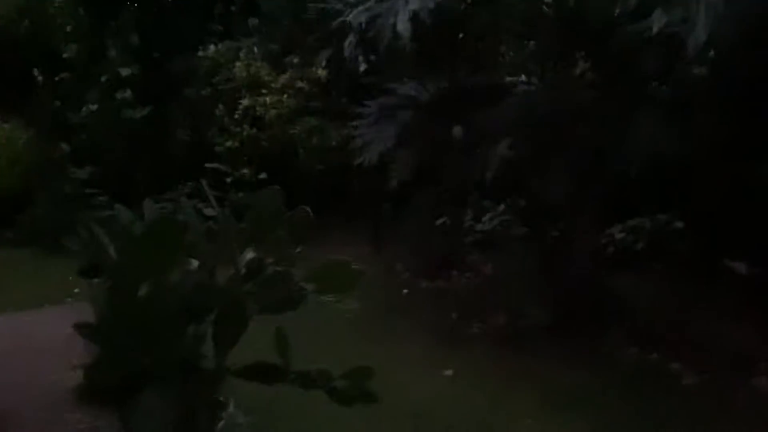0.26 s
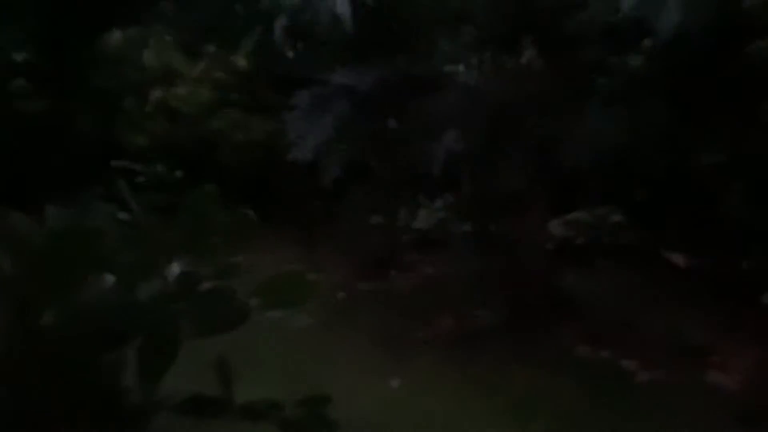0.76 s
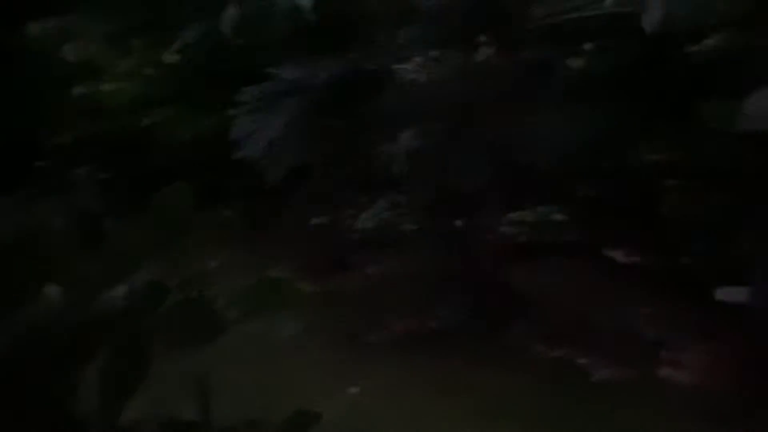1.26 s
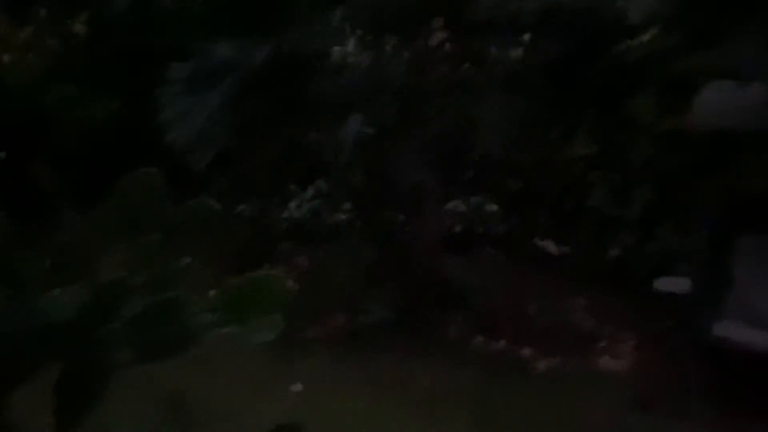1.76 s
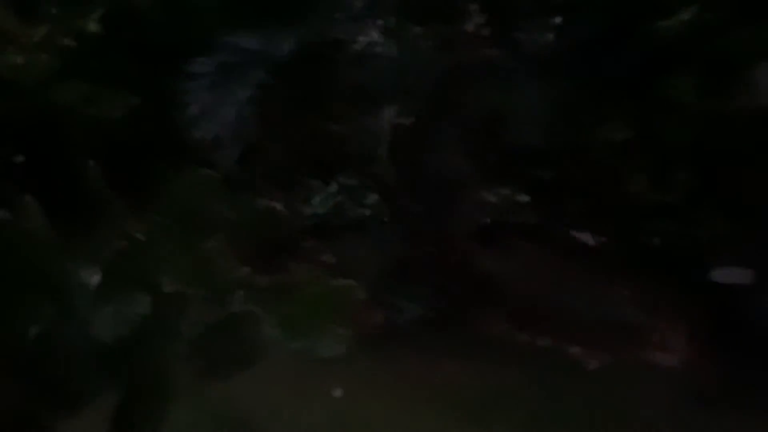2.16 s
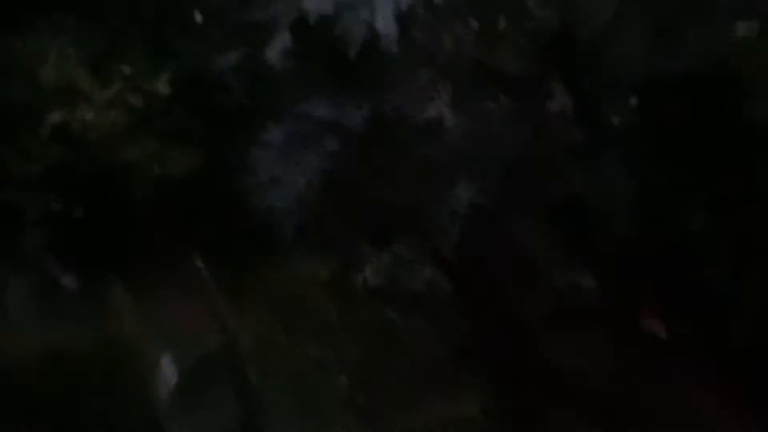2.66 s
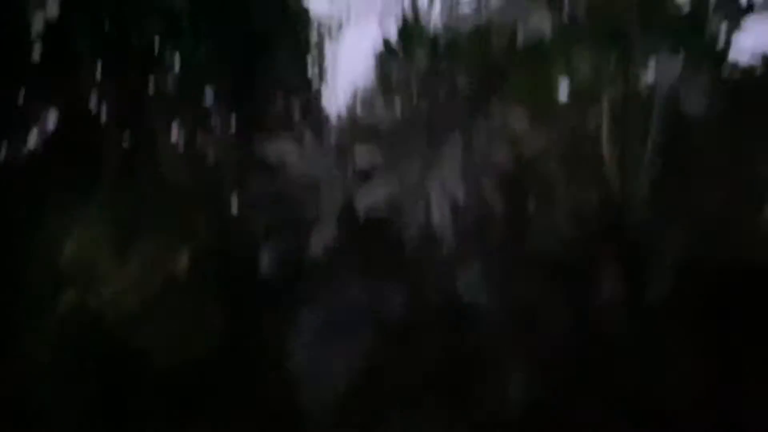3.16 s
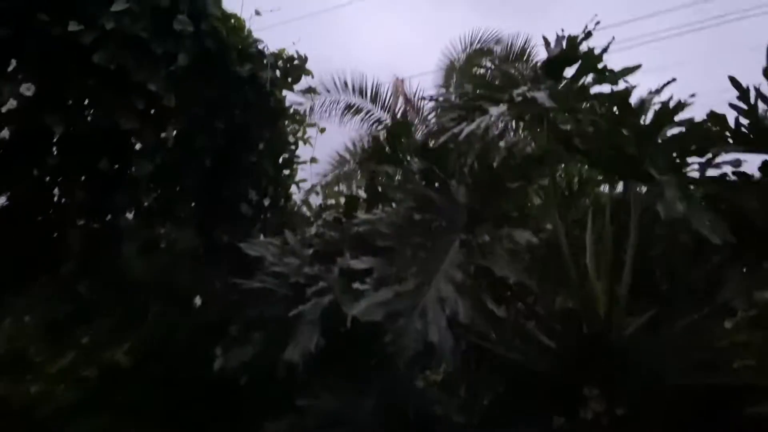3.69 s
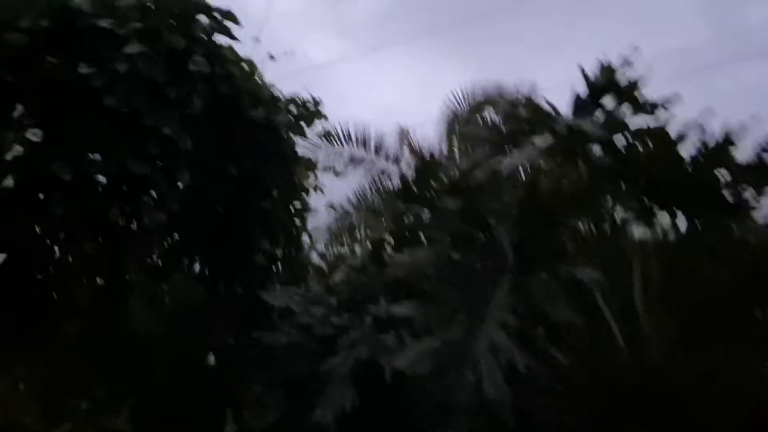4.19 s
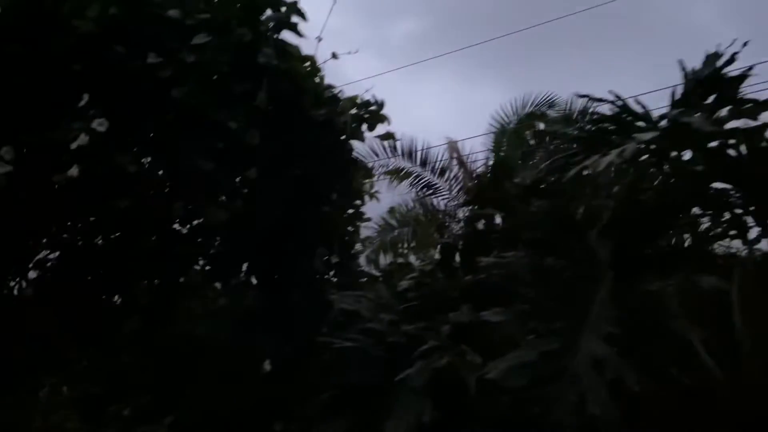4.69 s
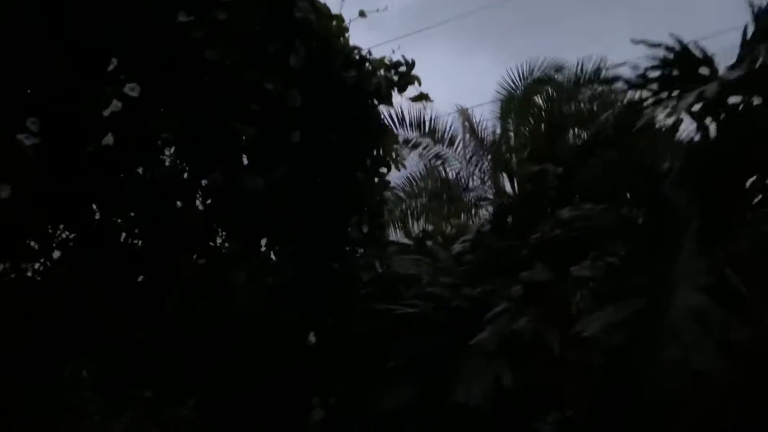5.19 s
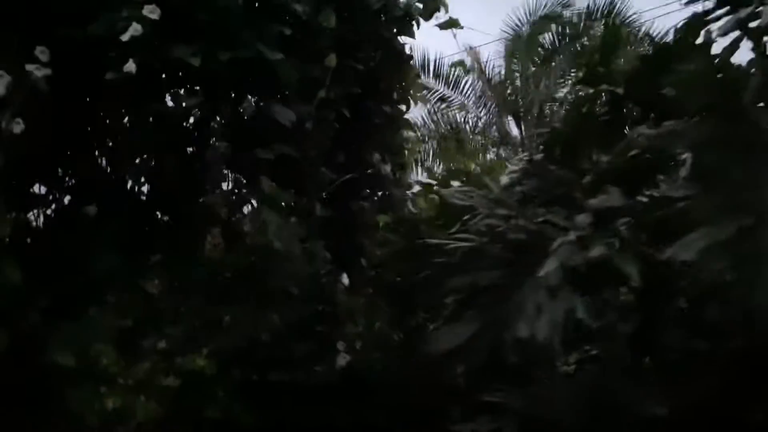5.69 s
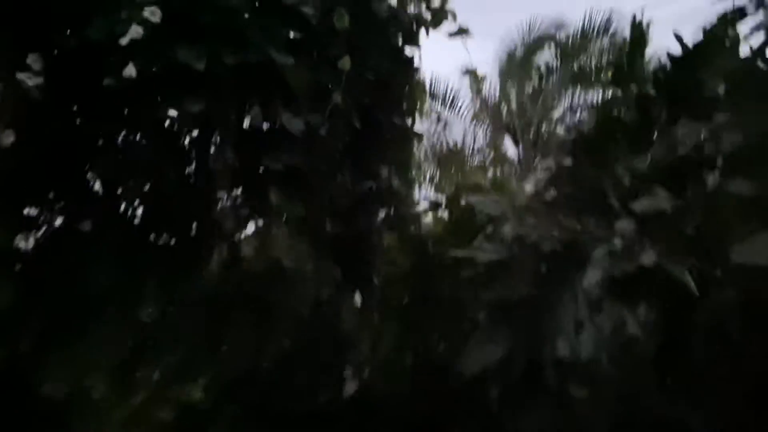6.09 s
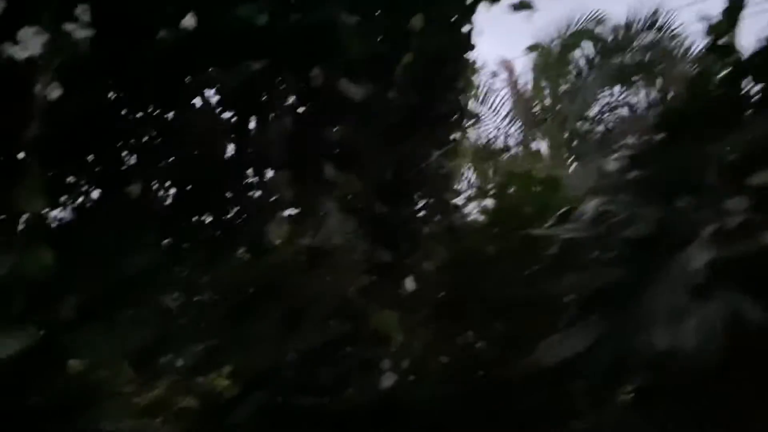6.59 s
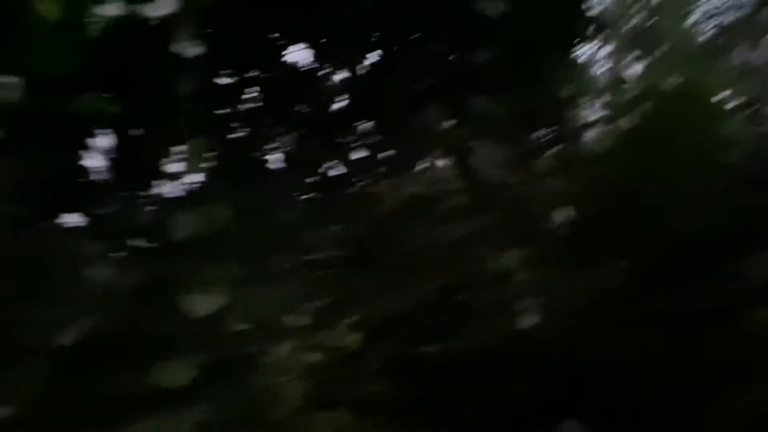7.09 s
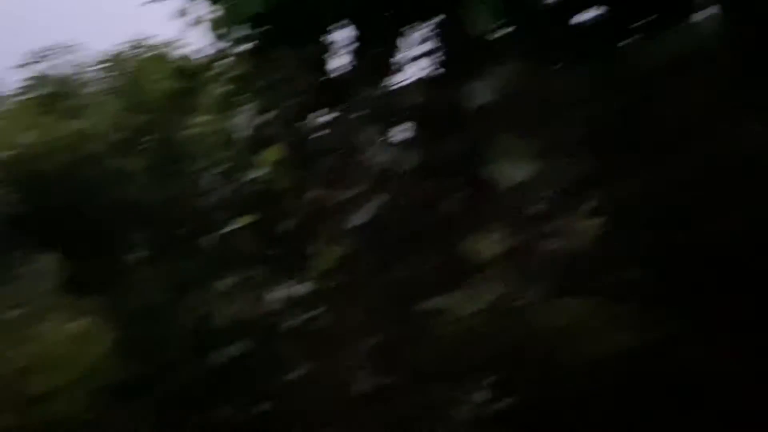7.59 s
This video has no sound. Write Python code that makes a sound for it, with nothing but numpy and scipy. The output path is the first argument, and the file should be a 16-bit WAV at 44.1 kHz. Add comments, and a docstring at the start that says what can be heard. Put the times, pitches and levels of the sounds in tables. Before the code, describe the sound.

Overlapping bird calls run without a break in a leafy garden. Brisk downward chips stand out in front, with mid-pitched sliding whistles among the trees and fainter, high, wavering peeps behind. Distant twittering swells and recedes. Leaves blur every call with short echoes, heard in open-air stereo. The bed is quiet, a steady deep rumble and thin hiss, with occasional tiny knocks and a faint rustle growing at the end.

```python
"""A leafy garden at dawn, full of birds. A near bird repeats a sharp falling chip two or three times a second,
another warbles slurred whistles, small birds add thin high notes and far flocks chatter: all are gliding tones.
Random echo clouds stand for leaves and trees, and a delayed dull copy of each chip for a wall.
Soft knocks tick over a low rumble and faint air, both of shaped noise; a sheen of hiss follows the calls.
A low rustle grows at the end."""
import sys
import numpy as np
from scipy import signal
from scipy.fft import rfft, irfft
from scipy.io import wavfile
from scipy.ndimage import map_coordinates

SR = 44100
rng = np.random.default_rng(int(sys.argv[2]) if len(sys.argv) > 2 else 0)


def generate_wav(signal):
    """Clip the signal to [-1, 1] and save it as 16-bit WAV at the path in sys.argv[1]."""
    frames = np.transpose(np.atleast_2d(signal))
    scaled = np.clip(frames, -1, 1) * 32767
    pcm = np.round(scaled).astype(np.int16)
    wavfile.write(sys.argv[1], SR, pcm)


N = 346185
TIME = np.arange(N) / SR


def from_db(db):
    """Decibels to amplitude gain."""
    return 10 ** (np.asarray(db) / 20)


def rms_one(x):
    """Scale to rms 1."""
    return x / np.sqrt(np.mean(x ** 2) + 1e-20)


def at_hz(points, hz):
    """Read a curve on a log-frequency axis."""
    f, value = np.transpose(points)
    return np.interp(np.log(hz + 1), np.log(f), value)


def level_over_time(points):
    """Turn (time, level) points into a gain for every sample, moving in straight lines of dB."""
    return from_db(np.interp(TIME, *np.transpose(points)))


def add(track, s, sound):
    """Mix a sound into a track at time s, cutting what runs past the end."""
    i = int(np.clip(s * SR, 0, N - 1))
    track[..., i:i + sound.shape[-1]] += sound[..., :N - i]


def wander(count, per_s):
    """Smooth random curve around zero, drawn through per_s random points a second."""
    knots = rng.standard_normal(256)
    return map_coordinates(knots, [np.arange(count) * per_s / SR], order=3, mode="wrap")


def spread(mid, side, alike):
    """Left and right from two independent noises: a likeness of 1 is mono, 0 is unrelated."""
    alike = np.clip(alike, -1, 1)
    return np.sqrt(1 + alike) * mid + np.sqrt(1 - alike) * side * [[1], [-1]]


def stereo_noise(spectrum):
    """Coloured noise at rms 1, nearly mono in the deep bass and wider in most of the range above."""
    # how alike left and right are: (frequency [Hz], likeness [-1 to 1])
    likeness = [(60, 0.96), (150, 0.84), (300, 0.71), (600, 0.23), (1200, 0), (3000, 0.5), (10000, 0)]
    hz = np.arange(N // 2 + 1) * SR / N
    mid, side = rfft(rng.standard_normal((2, N)))
    above = np.maximum(hz / spectrum[-1][0], 1)
    gain = from_db(at_hz(spectrum, hz)) / above ** 2  # 12 dB per octave further down past the last point
    return rms_one(irfft(gain * spread(mid, side, at_hz(likeness, hz)), N))


def note(length, pitches, crest, waver, waver_per_s, overtone_db, hold=0):
    """One syrinx tone: it holds its first pitch for a share of its length, glides on, wavers, swells and fades."""
    count = int(max(length, .01) * SR)
    u = np.arange(count) / count
    glide = np.interp(u, [np.clip(hold, 0, .9), 1], [0, 1])
    # a smooth curve of log pitch through start, middle and end
    bend = np.polyfit([0, .5, 1], np.log(pitches), 2)
    hz = np.exp(np.polyval(bend, glide))
    hz = hz * (1 + waver * wander(count, waver_per_s))
    phase = 2 * np.pi * np.cumsum(hz) / SR
    rise_and_fall = np.interp(u, [0, np.clip(crest, .05, .95), 1], [0, .5, 1])
    swell = np.sin(np.pi * rise_and_fall) ** .8
    return np.sqrt(2) * swell * (np.sin(phase) + from_db(overtone_db) * np.sin(2 * phase))


def slur(start_hz, end_hz, early):
    """Start, middle and end pitch of a slide that has gone the share `early` of its way at half glide."""
    return np.array([start_hz, start_hz * (end_hz / start_hz) ** early, end_hz])


def decay(t, delay, t60):
    """Echo power over time: it sets in after a delay and dies away by 60 dB in t60 seconds; sum 1."""
    power = (t >= delay) * from_db(-60 * np.abs(t - delay) / t60) ** 2
    return power / power.sum()


def scatter(fade_db, alike):
    """A stereo cloud of random echoes from leaves and branches under a decay curve."""
    mid, side = rng.standard_normal((2, len(fade_db)))
    return from_db(fade_db) * spread(mid, side, alike) / np.sqrt(2)


def screening(db):
    """The dB of direct sound that foliage takes from a fainter, more distant call."""
    near_db = -32.5  # calls at this level or above are not screened
    return 0.5 * np.clip(near_db - db, 0, 14)


def garden(sound, direct_db, leaves_db, trees_db, tail_db, pan_db):
    """Direct path, near foliage, trees and far tail; birds and listener move, so each call gets new echoes."""
    t = np.arange(SR // 2) / SR
    power = from_db(leaves_db) ** 2 * decay(t, delay=0.00075, t60=0.13)
    power += from_db(trees_db) ** 2 * decay(t, delay=0.029, t60=0.38)
    power += from_db(tail_db) ** 2 * decay(t, delay=0.029, t60=0.8)
    paths = scatter(10 * np.log10(power + 1e-20), alike=0.28)
    paths[:, 0] += from_db(direct_db)
    heard = signal.fftconvolve(sound[None], paths, axes=1)
    # echoes colour a call, but its energy depends only on the call and the strength of the paths
    heard *= np.linalg.norm(sound) * np.linalg.norm(paths) / np.linalg.norm(heard)
    return heard * from_db([[pan_db / 2], [-pan_db / 2]])  # positive pan leans left


def distant_rumble():
    """Low steady noise, strongest below about 100 Hz and leaning slightly left."""
    # rumble spectrum before overall scaling: (frequency [Hz], relative level [dB per Hz])
    spectrum = [(13, -45), (22, -35.5), (44, -2.5), (66, 3), (106, -2.5), (213, -18), (266, -15),
                (338, -20), (491, -20.5), (544, -17), (635, -23), (820, -21.5), (989, -26), (1300, -32.5),
                (1690, -46.5), (2860, -120)]
    return from_db(-54) * stereo_noise(spectrum) * from_db([[1.2], [-1.2]])


def still_air():
    """Faint steady hiss, fullest in the low treble."""
    # air spectrum before overall scaling: (frequency [Hz], relative level [dB per Hz])
    spectrum = [(900, -12), (1300, -3), (2500, -4), (5000, -11), (7000, -21), (9000, -35), (11500, -30),
                (16000, -46)]
    return from_db(-67.0) * stereo_noise(spectrum)


def low_rustle():
    """Soft low noise that grows out of near silence at the end."""
    # rustle spectrum before overall scaling: (frequency [Hz], relative level [dB per Hz])
    spectrum = [(60, -17.5), (130, -10.5), (280, 1), (500, -6.5), (1000, -32.5)]
    return level_over_time([(7.1, -95), (7.8, -65)]) * stereo_noise(spectrum)


def sheen(calls):
    """Soft, very high hiss that swells with each call and lingers briefly."""
    # sheen spectrum before overall scaling: (frequency [Hz], relative level [dB per Hz])
    spectrum = [(4000, -28.5), (7000, 2.5), (9000, -24.5), (11000, 8), (15500, -5)]
    fade_s = 0.016  # time constant of the followed power
    r = np.exp(-1 / (fade_s * SR))
    call_power = np.mean(calls ** 2, axis=0) + 1e-18
    loudness = np.sqrt(signal.lfilter([1 - r], [1, -r], call_power))
    return from_db(-37) * loudness * stereo_noise(spectrum)


def far_flock(low_hz, high_hz, glide, count):
    """Many distant birds call at random, bending up and down, heard only as echo; rms 1."""
    out = np.zeros(N)
    for k, (when, span, height, loud, bend, fall) in enumerate(rng.random((count, 6))):
        hz = low_hz * (high_hz / low_hz) ** height
        pitches = hz * np.exp(glide * np.array([bend - .5, 0, fall - .5]))
        length = 0.0296 + 0.065 * span
        call = note(length, pitches, crest=0.56, waver=0.0367, waver_per_s=500, overtone_db=-45.0)
        add(out, (k + when - 1) / count * N / SR, (.5 + loud) * call)
    echoes = scatter(-60 * TIME[:SR // 2] / 0.18, alike=0.31)  # down 60 dB in 0.18 s
    return rms_one(signal.fftconvolve(out[None], echoes, axes=1)[:, :N])


def far_chatter():
    """A distant flock of mid-pitched calls with wide glides, coming and going."""
    # loudness of the chatter: (time [s], level [dB])
    levels = [(0.0, -70), (0.5, -64), (1.5, -65), (3.0, -71.5), (4.2, -61), (4.7, -61), (5.6, -63.5),
              (6.6, -67), (7.0, -63.5), (7.85, -66.5)]
    return level_over_time(levels) * far_flock(low_hz=1918, high_hz=4036, glide=0.45, count=260)


def far_twitter():
    """A distant flock of higher calls with narrower glides, coming and going."""
    # loudness of the twitter: (time [s], level [dB])
    levels = [(0.0, -111), (0.4, -79.5), (1.92, -85), (2.19, -65), (3.0, -74.5), (3.15, -69), (6.16, -75),
              (7.26, -82.5), (7.85, -73)]
    return level_over_time(levels) * far_flock(low_hz=3950, high_hz=6950, glide=0.22, count=220)


def ticks():
    """Each tick is a brief, fast-damped knock with a shorter bright burst of noise on top."""
    # soft ticks: (time [s], level before the garden's paths [dB], body pitch [Hz])
    tick_list = [(0.632, -57.5, 1320), (1.99, -63, 700), (2.336, -62, 1550), (7.307, -63, 870)]
    out, t = np.zeros((2, N)), np.arange(SR // 20) / SR
    bright = signal.butter(2, [2500, 7500], "band", fs=SR, output="sos")
    for s, db, hz in tick_list:
        knock = np.sin(2 * np.pi * hz * t) * from_db(-60 * t / 0.0061)
        snap = signal.sosfilt(bright, rng.standard_normal(len(t))) * from_db(-60 * t / 0.001)
        tick = from_db(db) * (knock + from_db(-6) * snap)
        add(out, s, garden(tick, direct_db=19.5, leaves_db=26.0, trees_db=-5, tail_db=-9, pan_db=-1))
    return out


def small_birds():
    """Thin wavering notes, mostly falling, blurred by distance: echoes outweigh the direct sound."""
    # thin notes: (time [s], length [s], start pitch [Hz], end pitch [Hz], level before the garden's paths [dB])
    thin_notes = [(0.113, 0.15, 4880, 7550, -67), (0.433, 0.08, 6570, 5750, -67),
                  (1.253, 0.066, 6600, 4170, -55), (1.494, 0.078, 5760, 4770, -62),
                  (1.914, 0.1, 4440, 3970, -53.5), (1.919, 0.21, 7520, 5880, -63),
                  (1.924, 0.24, 8150, 7100, -68), (2.294, 0.052, 5910, 4170, -50),
                  (2.479, 0.092, 6170, 3570, -52), (2.696, 0.046, 6300, 6420, -62.5),
                  (3.007, 0.054, 6430, 7870, -59), (3.092, 0.076, 7070, 6700, -58.5),
                  (3.157, 0.045, 5360, 5430, -51.5), (3.343, 0.047, 6660, 4380, -56.5),
                  (3.911, 0.13, 7840, 6690, -51), (4.078, 0.056, 4000, 3820, -54.5),
                  (4.397, 0.066, 5380, 4590, -49.5), (4.672, 0.099, 4150, 4460, -62.5),
                  (4.682, 0.047, 6220, 5350, -64), (4.829, 0.08, 7150, 6120, -57.5),
                  (4.943, 0.078, 5900, 4360, -58.5), (5.199, 0.22, 4810, 4320, -57),
                  (5.476, 0.037, 7100, 6100, -66.5), (5.498, 0.086, 6080, 6320, -64),
                  (5.627, 0.13, 5370, 4680, -62), (5.808, 0.062, 5700, 5560, -59.5),
                  (5.86, 0.064, 6150, 6500, -66.5), (5.96, 0.11, 6000, 6800, -64),
                  (6.238, 0.024, 6880, 6660, -68), (6.394, 0.046, 4880, 5470, -66),
                  (6.608, 0.11, 5010, 4670, -60), (6.7, 0.057, 4620, 5740, -61.5),
                  (7.27, 0.044, 6420, 4750, -59)]
    out = np.zeros((2, N))
    for s, length, start_hz, end_hz, db in thin_notes:
        pitches = slur(start_hz, end_hz, early=0.72)
        tone = note(length, pitches, crest=0.35, waver=0.026, waver_per_s=790, overtone_db=-44.0)
        call = from_db(db) * tone
        add(out, s, garden(call, direct_db=-13, leaves_db=-8, trees_db=-9.0, tail_db=-15.5, pan_db=1.5))
    return out


def warbler():
    """Whistles from within the trees, some pure, some burry: each slides quickly, then settles on its last pitch."""
    # slurred whistles: (time [s], length [s], start pitch [Hz], end pitch [Hz],
    # level before the garden's paths [dB], burr [share of pitch])
    whistles = [(0.138, 0.071, 3270, 4000, -58, 0.02), (0.188, 0.056, 4160, 4130, -58, 0.015),
                (0.172, 0.11, 1753, 2333, -50, 0.052), (0.425, 0.079, 3030, 2698, -46.5, 0.048),
                (0.465, 0.064, 2858, 2854, -42, 0.014), (0.507, 0.057, 2625, 2370, -51, 0.049),
                (0.703, 0.04, 2670, 2453, -44, 0.013), (0.744, 0.071, 2510, 2393, -46, 0.015),
                (0.818, 0.032, 2396, 2363, -39, 0.0055), (0.873, 0.051, 2416, 2324, -47, 0.017),
                (1.059, 0.063, 3236, 3256, -49, 0.017), (1.146, 0.041, 3224, 3180, -45.5, 0.031),
                (1.174, 0.09, 3250, 2006, -49, 0.019), (1.608, 0.029, 2060, 2250, -48, 0.035),
                (1.61, 0.029, 2790, 2920, -62, .04), (1.657, 0.057, 2794, 2305, -49, 0.039),
                (1.896, 0.21, 3500, 2710, -61, 0.06), (2.617, 0.036, 1813, 2240, -43.5, 0.0084),
                (2.679, 0.13, 1546, 1914, -59, 0.039), (2.698, 0.047, 3380, 3282, -57.5, .012),
                (2.876, 0.066, 3830, 3340, -53, 0.034), (2.893, 0.19, 3400, 2150, -47, 0.0063),
                (3.227, 0.051, 3185, 3244, -49, 0.031), (3.228, 0.094, 2312, 2744, -47.5, 0.067),
                (3.264, 0.079, 3200, 1733, -52.5, 0.024), (3.352, 0.087, 1700, 1880, -51.5, 0.0048),
                (3.414, 0.087, 3640, 3720, -60.5, 0.02), (3.559, 0.063, 3740, 3240, -45.5, 0.013),
                (3.627, 0.064, 3180, 3130, -44.5, 0.0016), (3.842, 0.064, 2890, 2335, -45.5, 0.016),
                (3.883, 0.043, 2420, 2670, -40, 0.027), (3.924, 0.0444, 2600, 1993, -43, 0.013),
                (3.972, 0.039, 1880, 1796, -47, 0.0055), (4.973, 0.13, 3584, 3420, -57.5, 0.015),
                (5.062, 0.0674, 2820, 2260, -44.5, 0.051), (5.077, 0.091, 3430, 3684, -53.5, 0.022),
                (5.099, 0.054, 1954, 1634, -50, 0.049), (5.152, 0.095, 3610, 3270, -57.5, 0.021),
                (5.479, 0.095, 1750, 2326, -47.5, 0.071), (5.486, 0.13, 2750, 3310, -61.5, 0.032),
                (5.725, 0.12, 2718, 2810, -40, 0.048), (5.731, 0.037, 2020, 1824, -47.5, 0.019),
                (5.813, 0.073, 2550, 2356, -52.5, 0.051), (6, 0.15, 3000, 3370, -67, 0.03),
                (6.246, 0.11, 2900, 2670, -64, 0.035), (6.255, 0.048, 1740, 1980, -49, 0.049),
                (6.258, 0.056, 1544, 1478, -56.5, 0.032), (6.286, 0.032, 2090, 2245, -45.5, 0.03),
                (6.303, 0.067, 1773, 1360, -54.5, 0.042), (6.489, 0.09, 1370, 1714, -54, 0.046),
                (6.59, 0.084, 1767, 2250, -48.5, 0.0038)]
    out = np.zeros((2, N))
    for s, length, start_hz, end_hz, db, burr in whistles:
        pitches = slur(start_hz, end_hz, early=0.8)
        tone = note(length, pitches, crest=0.37, waver=burr, waver_per_s=400, overtone_db=-48.5)
        call = from_db(db) * tone
        direct_db = 0.0 - screening(db)
        add(out, s, garden(call, direct_db, leaves_db=0.5, trees_db=-9, tail_db=-8, pan_db=1.0))
    return out


def flicks():
    """The near bird opens some strong chips with a brief high tone that plunges just before the main stroke."""
    # opening flicks: (time [s], start pitch [Hz], end pitch [Hz], level before the garden's paths [dB])
    flick_list = [(2.125, 4930, 2560, -44), (3.495, 4890, 2450, -42), (6.107, 4440, 2530, -35.5),
                  (7, 3643, 2230, -39.5)]
    length = 0.02  # seconds
    out = np.zeros((2, N))
    for s, start_hz, end_hz, db in flick_list:
        pitches = slur(start_hz, end_hz, early=0.75)
        tone = note(length, pitches, crest=0.57, waver=0.011, waver_per_s=200, overtone_db=-34, hold=0.38)
        call = from_db(db) * tone
        add(out, s, garden(call, direct_db=-11, leaves_db=0, trees_db=-5.5, tail_db=-22.0, pan_db=2.0))
    return out


def near_bird():
    """Fast falling strokes from both sides of the syrinx; as the bird turns, a wall throws back more or less."""
    # falling chips: (time [s], length [s], start pitch [Hz], middle pitch [Hz], end pitch [Hz],
    # level before droop and the garden's paths [dB], wall echo against the chip before dulling [dB])
    chips = [(0.280, 0.047, 3600, 2260, 1600, -42.5, -2), (0.654, 0.046, 3656, 2410, 1745, -40, -4),
             (1.096, 0.052, 2930, 2185, 1410, -40, -10), (1.436, 0.049, 3090, 2405, 1830, -57.5, -3),
             (1.713, 0.057, 3550, 2600, 1540, -49.5, -15), (2.135, 0.046, 4236, 2452, 1620, -35.5, -17),
             (2.523, 0.053, 3350, 2200, 1380, -39, -7.5), (3.021, 0.071, 3505, 2406, 1520, -37, -4),
             (3.505, 0.043, 4150, 2320, 1743, -33, -22), (3.813, 0.038, 2955, 2370, 1850, -51, -19),
             (3.917, 0.057, 3650, 2350, 1920, -37, -4), (4.21, 0.049, 3950, 2500, 1745, -51, -23),
             (4.35, 0.071, 3070, 2267, 1320, -37, -14), (4.577, 0.063, 3350, 2400, 1700, -52.5, -17),
             (4.851, 0.05, 3590, 2240, 1500, -37, -10), (5.275, 0.032, 3576, 2346, 1840, -36.5, -2.5),
             (5.637, 0.071, 3790, 2537, 1636, -35, -9.5), (6.119, 0.043, 4000, 2645, 1265, -34, -28),
             (6.519, 0.05, 3350, 2250, 1510, -35, -24), (7.014, 0.042, 3450, 2177, 1570, -33.5, -4.5),
             (7.448, 0.059, 4160, 2244, 1585, -39, -8.5)]
    crest, hold = 0.5, .15  # loudest point and time held at the top pitch, as shares of the chip
    droop_db = 5  # a chip loses this much force as it falls
    wall_echo_s, wall_dull_hz = .044, 3160
    out = np.zeros((2, N))
    wall = signal.butter(2, wall_dull_hz, fs=SR, output="sos")
    for s, length, start_hz, middle_hz, end_hz, db, echo_db in chips:
        pitches = np.array([start_hz, middle_hz, end_hz])
        first = note(length, pitches, crest, waver=0.026, waver_per_s=456, overtone_db=-30.5, hold=hold)
        # the weaker side glides down later and more roughly, and beats against the first
        lagging = pitches * [.97, 1.2, 1.2]
        second = note(length, lagging, crest, waver=0.05, waver_per_s=900, overtone_db=-37.5, hold=hold)
        push_db = droop_db * np.linspace(0.4, -0.6, len(first))
        chip = from_db(db + push_db) * (first + from_db(-11) * second)
        direct_db = -6 - screening(db)
        heard = garden(chip, direct_db, leaves_db=-2.0, trees_db=-11.0, tail_db=-20.0, pan_db=0.8)
        add(out, s, heard)
        # the wall's echo is duller, with left and right swapped
        echo = signal.sosfilt(wall, heard[::-1])
        add(out, s + wall_echo_s, from_db(echo_db) * echo)
    return out


def scene():
    """Near and far birds over the rumble and the still air."""
    background = distant_rumble() + still_air() + low_rustle()
    far_birds = far_chatter() + far_twitter()
    calls = small_birds() + warbler() + flicks() + near_bird()
    return background + far_birds + ticks() + sheen(calls) + calls


def record(dry):
    """A steep low-pass cuts the top of the treble."""
    cutoff_hz = 15800
    steep = signal.ellip(10, .1, 80, cutoff_hz, fs=SR, output="sos")  # 0.1 dB ripple, 80 dB rejection
    return signal.sosfilt(steep, dry, axis=-1)


dry = scene()
out = record(dry)
generate_wav(out)
```